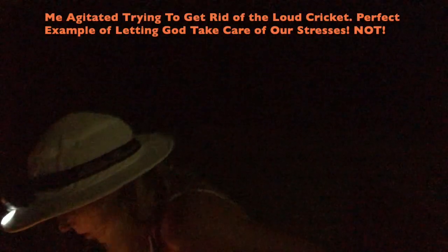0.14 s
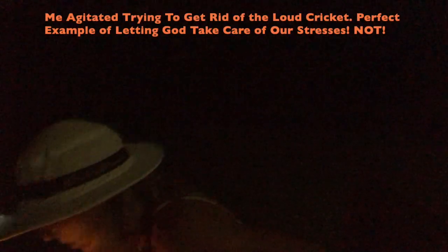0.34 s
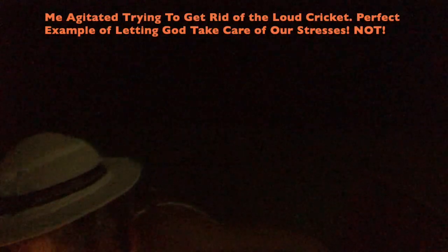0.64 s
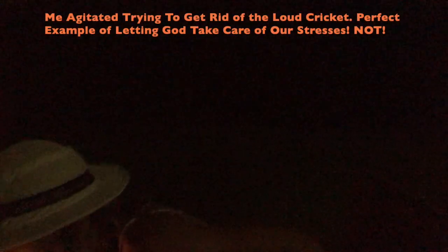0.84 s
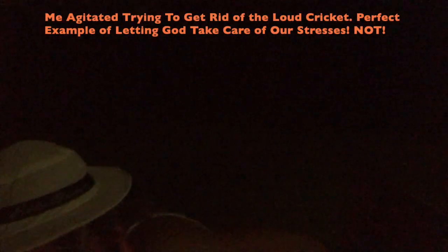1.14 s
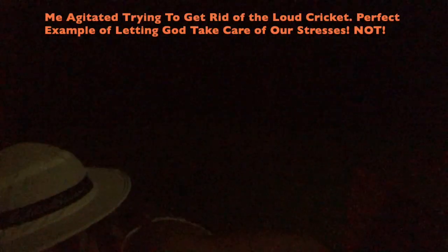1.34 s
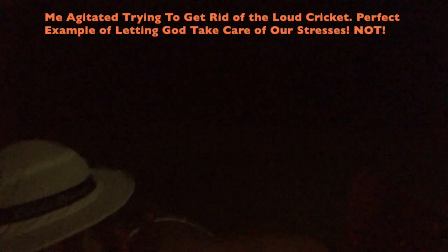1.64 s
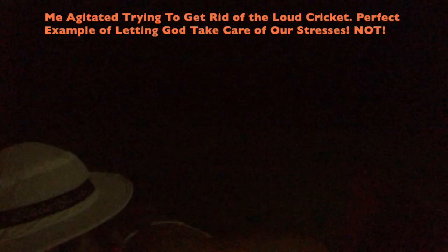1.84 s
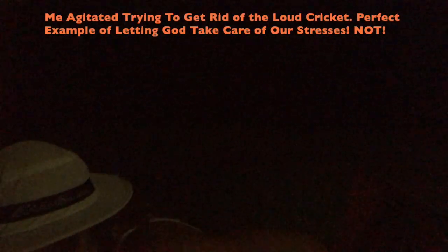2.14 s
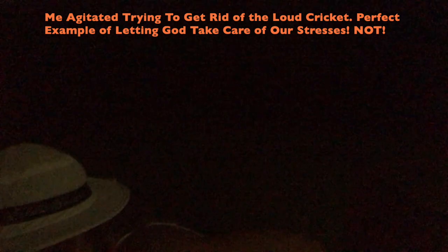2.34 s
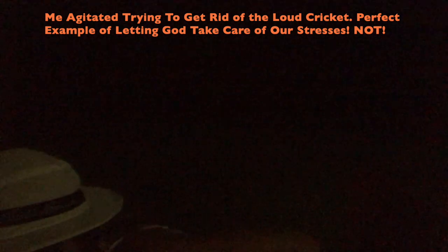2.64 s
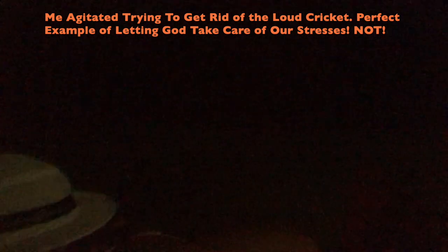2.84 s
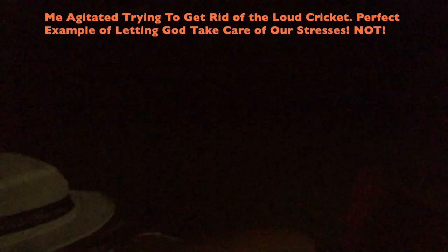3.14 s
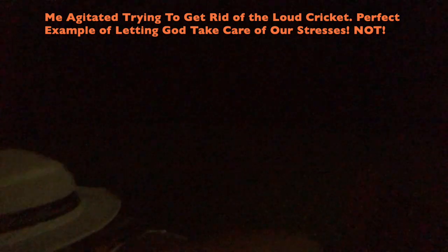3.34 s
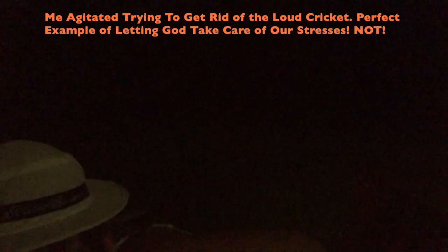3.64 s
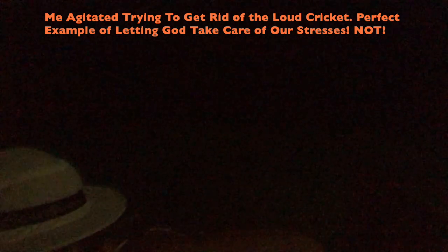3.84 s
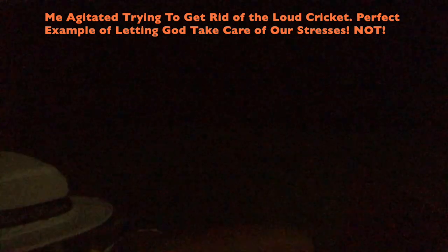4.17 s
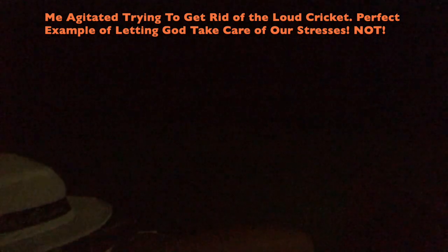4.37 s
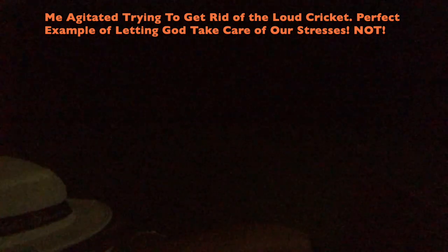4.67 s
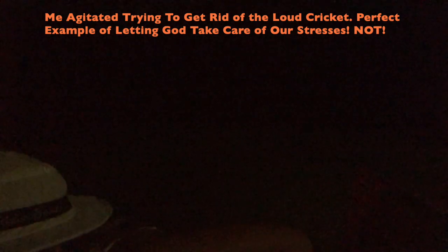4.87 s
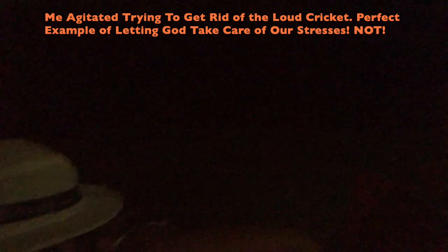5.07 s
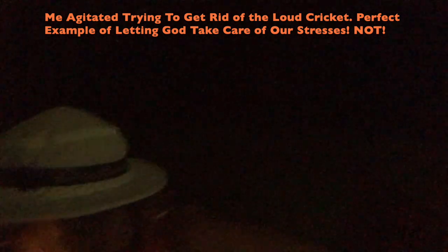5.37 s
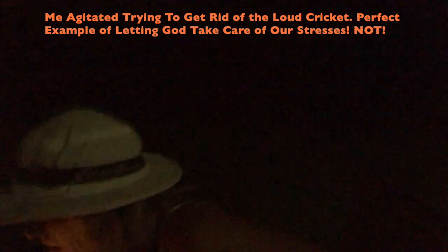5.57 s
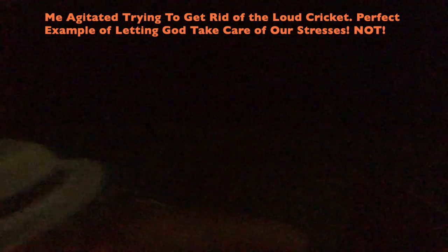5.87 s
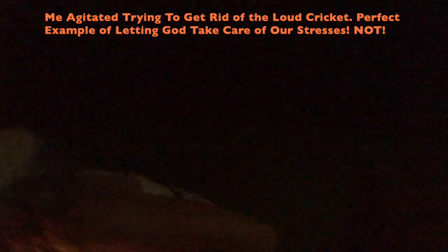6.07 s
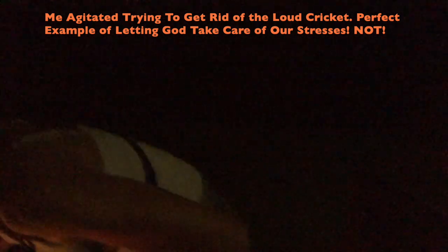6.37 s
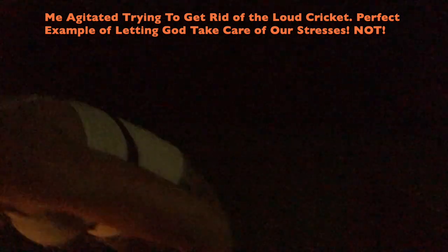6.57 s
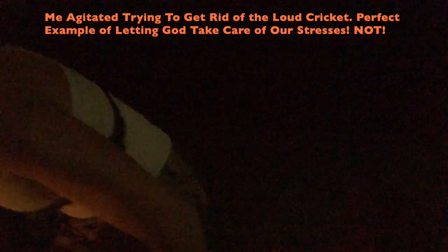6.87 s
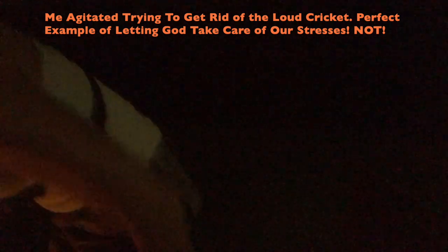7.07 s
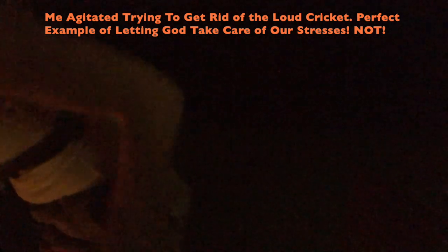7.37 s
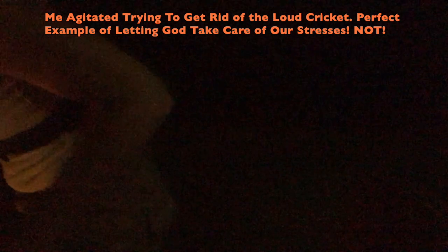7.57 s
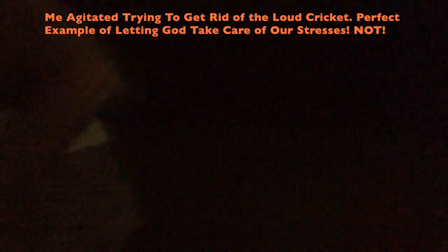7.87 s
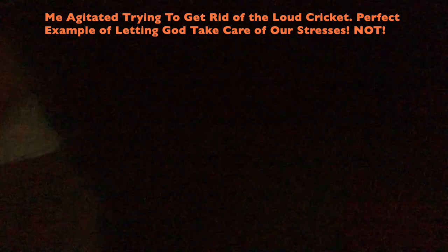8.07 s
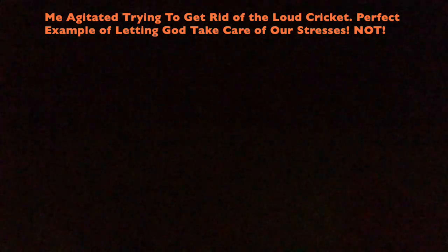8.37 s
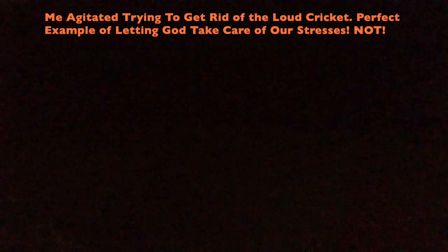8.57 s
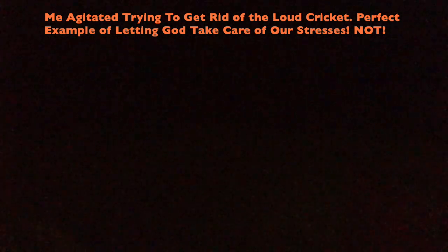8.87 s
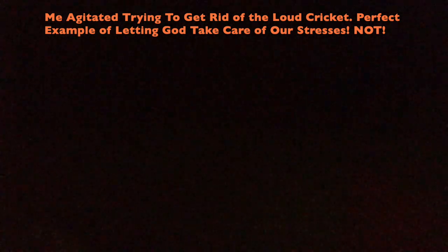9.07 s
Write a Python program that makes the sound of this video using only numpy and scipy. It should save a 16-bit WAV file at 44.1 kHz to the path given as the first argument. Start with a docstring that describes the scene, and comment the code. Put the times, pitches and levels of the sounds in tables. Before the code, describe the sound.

A cricket chirps steadily in quick triplets over a faint night insect chorus while a tool scuffs dry ground, thumps and clinks on stone.

```python
"""Night outdoors, a chorus of far insects over low air noise throughout: noise in flickering bands.
Small high trills and a field cricket chirping in threes (near-sine strokes) begin; a katydid hisses in puffs.
Soon a metal tool scuffs dry ground (grit clicks), a far animal hoots (arched tones), dull thumps fall
(sinking sines) and the blade clinks on stone (ringing modes). From 3 s to 5.7 s a nearer cricket joins now
and then, with overtones and rasp; scuffs pause after 5 s and return faintly near the end."""
import sys
import numpy as np
from scipy import signal
from scipy.fft import rfft, irfft
from scipy.io import wavfile
from scipy.ndimage import uniform_filter1d

SR = 44100
rng = np.random.default_rng(int(sys.argv[2]) if len(sys.argv) > 2 else 0)


def put_to_file(sound):
    """Save the sound as 16-bit audio at rate SR, in the file named by the first command-line argument."""
    columns = np.atleast_2d(sound).T  # one column per channel
    safe = np.clip(columns, -1, 1)
    whole_steps = np.round(safe * 32767)
    wavfile.write(sys.argv[1], SR, whole_steps.astype(np.int16))


N = 406161

# Swell of far chorus and night air: time_s, chorus_db, air_db
NIGHT_LEVELS = [(0, -54.5, -67.5), (2.5, -55, -69), (5.7, -55.5, -69.5), (6.5, -53, -62.5),
                (7.9, -56.5, -70.5), (9.21, -52.5, -63)]
# Chorus spectrum, relative: frequency_hz, density_db
CHORUS_SPECTRUM = [(1300, -58), (1700, -25.5), (2020, -13), (2650, -5), (2810, 3.5), (2970, -6),
                   (3600, -20.5), (5330, -7.5), (5750, -12), (6200, -23.5), (7500, -27.5), (8100, -37.5),
                   (12400, -38), (16000, -33)]
# Air noise spectrum, relative: frequency_hz, density_db
AIR_SPECTRUM = [(30, -48), (70, -5), (157, 1), (455, -2.5), (1220, -9), (1700, -9.5), (2300, -30.5)]
# Katydid level curve: time_s, level_db
KATYDID_LEVELS = [(0, -76), (1, -87), (3, -73), (5, -71.5), (6.3, -66), (7.6, -89), (8.3, -65.5),
                  (9.2, -64)]
# Katydid singing bouts, each at its own rasp rate: from_s, rasp_rate_hz
KATYDID_RASP_RATES = [(-.047, 13.3), (3.969, 13.08), (6.186, 13.19)]
# Small high cricket, one trill a row: start_s, level_db
HIGH_TRILLS = [(0.141, -59.5), (0.474, -57), (1.173, -62.5), (1.471, -62), (1.812, -68), (2.463, -67),
               (2.805, -66.5), (4.585, -67), (5.262, -63.5), (5.59, -63), (5.913, -61.5), (7.315, -64.5)]
# Far hoots: start_s, length_s, level_db
FAR_HOOTS = [(0.899, 0.11, -56.5), (1.199, 0.3, -66.5), (1.62, 0.21, -65.5), (4.376, 0.048, -48),
             (6.275, 0.12, -46), (6.771, 0.082, -44.5)]
# Field cricket, three wing strokes a row: middle_s (12 ms before that stroke ends), gap_s, level_db,
# first_under_db (first stroke below the middle one)
FIELD_CHIRPS = [(0.39, 0.049, -34.5, 1), (.864, 0.049, -36.5, 6), (1.327, 0.05, -37.5, 6.5),
                (1.7904, 0.051, -36, 7.5), (2.348, 0.055, -38.5, 1.5), (3.183, 0.052, -37, 1),
                (3.628, .0515, -37.5, 1), (4.092, 0.051, -35.5, 2.5), (4.622, 0.049, -38.5, 4),
                (5.2032, 0.052, -36.5, 18), (5.7004, 0.049, -37.5, -0.5), (6.195, 0.049, -36.5, 7.5),
                (6.702, .051, -35, 1), (7.219, 0.05, -36, 6.5), (7.656, 0.052, -34.5, 4.5),
                (8.173, 0.049, -34, 0.5), (8.6822, 0.05, -34.5, 5), (9.164, 0.049, -34, 3)]
FIRST_GAP_SHARE, LAST_STROKE_DB = 0.91, 0.4   # shorter first gap, slightly louder last stroke
# Near cricket strokes: start_s, level_db, length_s, slip (strength, 0-1)
NEAR_WING_STROKES = [(3.070, -35, 0.019, 0.2), (3.114, -33.5, 0.019, 0.5), (3.915, -34, 0.022, 0.46),
                     (3.961, -29, 0.024, 0.53), (4.01, -28, 0.026, 0.28), (4.745, -34, .023, 0.6),
                     (4.79, -27.5, 0.027, 0.45), (5.162, -29.5, 0.025, 0.13), (5.209, -27.5, 0.025, 0.6),
                     (5.578, -30, 0.023, 0.05), (5.621, -28.5, 0.026, .6)]
NEAR_HZ, NEAR_HZ_PER_DB = 4314, 11.5   # base pitch at -28 dB; stronger strokes are higher
SLIP_AFTER_S, SLIP_WIDTH_S = 0.0104, 0.0018   # slip time into the stroke, width
SLIP_DIP_SHARE, SLIP_RASP_DB = 0.067, -18.5   # pitch dip at full slip, rasp relative to the stroke
# Ground thumps: start_s, level_db, pitch_hz (scale of the sinking pitch)
GROUND_THUMPS = [(1.143, -45.5, 402), (1.167, -49, 157), (1.578, -33, 126), (2.219, -27.5, 565),
                 (2.249, -35.5, 535), (2.876, -46, 270), (3.102, -33, 545), (3.133, -31, 560),
                 (3.14, -44.5, 200), (3.156, -36, 493), (4.803, -25.5, 510), (4.81, -36.5, 221),
                 (7.047, -45, 477), (7.055, -27.5, 240), (7.333, -51, 180), (7.520, -52.5, 206),
                 (8.36, -28.5, 173), (8.868, -47, 388), (9.013, -52.5, 192)]
# Blade meets a stone: time_s, level_db, pitch_factor (set by the grip), ring_factor (on mode t60)
STONE_CLINKS = [(1.57, -45.5, 1.05, 0.65), (2.199, -26.5, 0.97, 0.73), (3.107, -38.5, 0.98, .9),
                (4.176, -36, 1.02, 1.2), (4.207, -43, 1.014, .9), (6.981, -41, 1.17, .35)]
# Blade modes before the grip factors: frequency_hz, level_db, t60_s
BLADE_MODES = [(2550, -1, 0.014), (3290, 8.5, 0.029), (3447, 0.5, 0.02)]
# Tool pushed into dry soil, then dragged: start_s, level_db, treble_db and body_db (over level_db),
# drag_after_s, drag_under_db (below the push)
SOIL_SCUFFS = [(0.725, -42.5, -5, -2.5, 0.022, 21), (1.141, -51, 5, -14, 0.035, 34),
               (1.549, -52, -1, -14, 0.014, -2.5), (2.17, -34, -7.5, -2, 0.059, 10),
               (2.662, -33.5, -12, -8.5, 0.054, 8.5), (3.094, -37, -8, -2.5, 0.055, 9.5),
               (3.525, -34.5, -9, -9, 0.049, 8.5), (4.163, -32.5, -9, -12, 0.053, 8),
               (4.742, -35, -13.5, -15, 0.036, 5.5), (9.127, -56, -11, -5, .04, 28)]
# Pebbles and twigs snap: start_s, level_db, treble_db and body_db (over level_db)
PEBBLE_SNAPS = [(0.739, -37, -2, -4), (0.745, -34, 1, 0.5), (.854, -56.5, -7, 1), (1.597, -49, 8.5, -24),
                (2.198, -26.5, -4.5, -14), (2.231, -55, 2, -10), (2.667, -36, -7, 0), (2.71, -41, -7, -10),
                (3.386, -77, 11, -8), (3.588, -45, 3.5, 2), (4.155, -45, -2, -9), (4.209, -29, -3.5, -12),
                (4.802, -27, -5.5, -5), (7.179, -67, 10.5, -19), (8.161, -64, 1, -17)]
# Grit click spectrum, relative: frequency_hz, density_db
GRIT_SPECTRUM = [(150, -13), (530, -7.5), (1500, -4), (3300, 0), (5200, -0.5), (7000, -4.5), (12000, -9),
                 (16000, -10)]
PUSH_SWELL_S, PUSH_T60_S, DRAG_T60_S = 0.0067, 0.13, 0.13
DRAG_TREBLE_DB, DRAG_BODY_DB = 3.5, 2.5   # added to the push's treble_db and body_db
SNAP_SWELL_S, SNAP_T60_S = 0.0015, 0.035
CUTOFF_HZ = 16240


def amp(db):
    """Decibels to gain."""
    return 10 ** (np.asarray(db) / 20)


def rms_one(x):
    """Scale to rms 1."""
    return x / np.sqrt(np.mean(x ** 2) + 1e-20)


def in_time(rows):
    """Interpolate the columns of a curve table to one value a sample."""
    time_s, *columns = np.transpose(rows)
    return [np.interp(np.arange(N) / SR, time_s, column) for column in columns]


def add(out, start_s, sound):
    """Mix a sound in at a time."""
    i = max(round(start_s * SR), 0)
    out[i:i + len(sound)] += sound[:max(N - i, 0)]


def coloured(x, spectrum):
    """Shape a sound to a spectrum, interpolated over log frequency."""
    hz, db = np.transpose(spectrum)
    grid_hz = np.maximum(np.arange(N // 2 + 1) * SR / N, 1)
    gain = amp(np.interp(np.log(grid_hz), np.log(hz), db))
    return irfft(rfft(x) * gain, N)


def band(x, low_hz, high_hz):
    """Band-pass."""
    edges_hz = [low_hz, min(high_hz, 0.45 * SR)]
    return signal.sosfilt(signal.butter(2, edges_hz, "band", fs=SR, output="sos"), x)


def drift(rate_hz):
    """Low-passed noise, mean 0, rms 1."""
    r = np.exp(-2 * np.pi * rate_hz / SR)
    slow = signal.lfilter([1], [1, -2 * r, r * r], rng.standard_normal(N + SR))[SR:]
    return rms_one(slow - slow.mean())


def scatter(x, t60_s):
    """Diffuse tail from plants and walls: convolution with decaying noise."""
    t = np.arange(round(t60_s * SR)) / SR
    tail = rng.standard_normal(len(t)) * amp(-60 * t / t60_s) * np.minimum(t / 0.0078, 1)
    return signal.fftconvolve(x, tail / np.sqrt(np.sum(tail ** 2)))[:N]


def ring(x, hz, t60_s):
    """Two-pole resonator: a unit click starts a decaying sine of height about 1."""
    r, w = amp(-60 / (t60_s * SR)), 2 * np.pi * hz / SR
    return signal.lfilter([0, np.sin(w)], [1, -2 * r * np.cos(w), r * r], x + 1e-18)


def stroke(hz, length_s, fall, skew, overtones_db, slip_s=0, slip=0):
    """File over scraper: a near sine falls in pitch as the wing closes; a slip jolts it and dips the pitch."""
    u = np.arange(round(length_s * SR)) / (length_s * SR)
    late = (u * length_s - slip_s) / SLIP_WIDTH_S
    jolt = slip * np.exp(-late ** 2)
    pitch_hz = hz * (1 + fall * (0.5 - u ** 1.26) - SLIP_DIP_SHARE * jolt)
    phase = 2 * np.pi * np.cumsum(pitch_hz) / SR + rng.uniform(0, 2 * np.pi)
    wave = np.sin(phase)
    for harmonic, db in enumerate(overtones_db, start=2):
        wave = wave + amp(db) * np.sin(harmonic * phase)
    jolt_gain = 1 + 0.7 * jolt - 0.4 * slip * np.exp(-(late - 1.5) ** 2)   # surge, then sag
    return wave * jolt_gain * np.sin(np.pi * u ** skew) ** 0.7


def night():
    """Many far crickets blur into flickering bands; low air noise lies below."""
    chorus_db, air_db = in_time(NIGHT_LEVELS)
    choir = coloured(rng.standard_normal(N), CHORUS_SPECTRUM)
    choir = choir / np.std(band(choir, 1820, 4530))
    low = band(choir, 1330, 3590)
    high = choir - band(choir, 1580, 3520)
    choir = low * amp(1.17 * drift(32)) + high * amp(0.64 * drift(22))
    air = rms_one(coloured(rng.standard_normal(N), AIR_SPECTRUM)) * amp(1.9 * drift(31))
    return amp(chorus_db) * choir + amp(air_db) * air


def katydid():
    """A dry hiss at the very top, one puff per rasp, unevenly loud."""
    t = np.arange(N) / SR
    from_s, rate_hz = np.transpose(KATYDID_RASP_RATES)
    row = np.searchsorted(from_s, t) - 1
    cycles = rate_hz[row] * (t - from_s[row])
    puffs = (0.5 - 0.5 * np.cos(2 * np.pi * cycles)) ** 2.5
    hiss = rms_one(band(band(rng.standard_normal(N), 14000, 16500), 13400, 17500))
    uneven_db = 3.0 * drift(8)
    return amp(in_time(KATYDID_LEVELS)[0] + uneven_db) * puffs * hiss


def trills():
    """Seven short pure pulses, 12.1 ms apart, uneven but on average growing louder."""
    out = np.zeros(N)
    for start_s, level_db in HIGH_TRILLS:
        for k in range(7):
            pulse_db = level_db + 1.0 * (k - 0.5) + 2.0 * rng.normal()
            add(out, start_s + 0.0121 * k, amp(pulse_db) * stroke(7800, 0.0097, 0.017, 1.0, []))
    return out


def hoots():
    """Soft, husky tones arched in pitch and level, trailing off over the distance."""
    out, wobble = np.zeros(N), 1 + 0.028 * drift(40)
    for start_s, length_s, level_db in FAR_HOOTS:
        u = np.arange(round(length_s * SR)) / (length_s * SR)
        arch = np.sin(np.pi * u)
        hz = 462 * (1 + 0.049 * (arch - 0.6)) * wobble[round(start_s * SR):][:len(u)]
        add(out, start_s, amp(level_db) * arch * np.sin(2 * np.pi * np.cumsum(hz) / SR))
    out = out * amp(3.5 * drift(35))   # the voice wavers
    return amp(-2) * out + amp(-13) * scatter(out, 0.25)


def field_cricket():
    """Three strokes a chirp, from a few metres off; weaker ones are a little lower; grass smears their ends."""
    out = np.zeros(N)
    for middle_s, gap_s, level_db, first_under_db in FIELD_CHIRPS:
        strokes = [(middle_s - FIRST_GAP_SHARE * gap_s, level_db - first_under_db, 0.015),
                   (middle_s, level_db, 0.021),
                   (middle_s + gap_s, level_db + LAST_STROKE_DB, 0.019)]
        for s, db, length_s in strokes:
            sound = stroke(4597 + 5.2 * (db + 32), length_s, 0.039, 1.9, [])
            add(out, s + 0.012 - length_s, amp(db) * sound)
    out = out * amp(1.6 * drift(110))   # the file catches unevenly
    return out + amp(-10.5) * scatter(out * amp(4.0 * drift(250)), 0.2)


def near_cricket():
    """Longer strokes with overtones, uneven, with a broad noise rasp where the wing slips."""
    out, rasp, puff = np.zeros(N), np.zeros(N), np.hanning(round(0.011 * SR))
    for start_s, level_db, length_s, slip in NEAR_WING_STROKES:
        slip = np.clip(slip, 0, 1)
        hz = NEAR_HZ + NEAR_HZ_PER_DB * (level_db + 28)
        sound = stroke(hz, length_s, 0.075, 1.13, [-15, -27], SLIP_AFTER_S, slip)
        add(out, start_s, amp(level_db) * sound)
        rasp_puff = amp(level_db + SLIP_RASP_DB) * (0.3 + slip) * puff
        add(rasp, start_s + SLIP_AFTER_S - 0.004, rasp_puff)
    out = out * amp(1.8 * drift(150))   # the file catches unevenly
    white = rng.standard_normal(N)
    top = rms_one(band(band(white, 10900, 14000), 10000, 13500))
    rasp = rasp * (top + amp(-1) * rms_one(band(white, 5300, 16500)))
    return out + rasp + amp(-9.5) * scatter(rasp, 0.077)


def thumps():
    """A soft blow runs through the ground, high waves first, so pitch sinks; dull noise roughens it."""
    out, t = np.zeros(N), np.arange(SR // 4) / SR
    for start_s, level_db, hz in GROUND_THUMPS:
        age = t / (0.012 + 6.2 / hz)   # low thumps last longer
        attack = np.sin(np.pi / 2 * np.minimum(t * hz / 0.45, 1)) ** 2
        shape = attack * (amp(-60 * age ** 1.6) + amp(-19 - 22 * age))
        sinking_hz = hz * (0.5 + 0.62 * np.exp(-t * hz / 3.18) + 1.22 * np.exp(-t * hz / 0.54))
        wave = np.sin(2 * np.pi * np.cumsum(sinking_hz) / SR)
        noise = band(rng.standard_normal(len(t)), 0.5 * hz, 2.12 * hz)
        puff = rms_one(band(noise, 0.27 * hz, 2.86 * hz))
        add(out, start_s, amp(level_db) * shape / shape.max() * (wave + 0.38 * puff))
    return signal.sosfilt(signal.butter(4, 60, "high", fs=SR, output="sos"), out)


def clinks():
    """A scratch of a few milliseconds rings the blade, each mode with fresh noise."""
    out, burst = np.zeros(N), np.hanning(round(0.0083 * SR)) ** 0.18
    for time_s, level_db, pitch_factor, ring_factor in STONE_CLINKS:
        for mode_hz, mode_db, t60_s in BLADE_MODES:
            hz = mode_hz * pitch_factor
            scratch = np.pad(burst * rng.standard_normal(len(burst)), (0, SR // 10))
            note = ring(band(scratch, 0.8 * hz, 1.25 * hz), hz, t60_s * ring_factor)
            add(out, time_s - 0.002, amp(level_db + mode_db) * note / np.max(np.abs(note)))
    return out + amp(-12) * scatter(out, 0.12)


def scuff_levels():
    """Power of body, middle and treble grit: pushes and drags swell, hold and die; snaps are short."""
    moves = []
    for s, db, treble_db, body_db, drag_after_s, drag_under_db in SOIL_SCUFFS:
        start_s = s - PUSH_SWELL_S / 2
        moves.append((start_s, db, treble_db, body_db, PUSH_SWELL_S, PUSH_T60_S))
        moves.append((start_s + drag_after_s, db - drag_under_db, treble_db + DRAG_TREBLE_DB,
                      body_db + DRAG_BODY_DB, PUSH_SWELL_S, DRAG_T60_S))
    moves += [(*row, SNAP_SWELL_S, SNAP_T60_S) for row in PEBBLE_SNAPS]
    powers, t = np.zeros((3, N)), np.arange(SR // 3) / SR
    for start_s, db, treble_db, body_db, swell_s, t60_s in moves:
        fade_s = np.maximum(t - swell_s - 0.088 * t60_s, 0)
        shape = np.minimum(t / swell_s, 1) ** 2 * amp(-60 * fade_s / t60_s)
        for power, part_db in zip(powers, (body_db, 0, treble_db)):
            add(power, start_s, (amp(db + part_db) * shape) ** 2)
    return powers


def scuffs():
    """Dense random grit clicks, split into patchy bands, sound under each push, drag and snap."""
    powers = scuff_levels()
    hits = rng.random(N) < 6000 / SR   # 6000 clicks/s
    clicks = hits * amp(3.5 * np.minimum(rng.exponential(1, N), 3.2)) * rng.choice([-1, 1], N)
    grit = coloured(clicks, GRIT_SPECTRUM) * amp(2.0 * drift(105))
    edges_hz = np.geomspace(200, 19000, num=25)
    patches = []
    for k, (low_hz, high_hz) in enumerate(zip(edges_hz, edges_hz[1:])):
        patchy = amp(3.5 * drift(29))   # each band swells and fades at random
        patches.append(band(grit, low_hz, high_hz) * patchy * (-1) ** k)
    # body below 1.9 kHz, treble above 8.9 kHz
    parts = [rms_one(sum(group)) for group in (patches[:12], patches[12:20], patches[20:])]
    return np.sum(np.sqrt(powers) * parts, axis=0)


def scene():
    """All sources, one channel; ground and near cricket share a diffuse tail."""
    singer, ground = near_cricket(), scuffs()
    tail = amp(-11) * scatter(ground + 0.5 * singer, 0.24)
    background = night() + katydid() + trills() + hoots()
    return (background + field_cricket() + singer + thumps() + clinks() + ground + tail)[None]


def record(dry):
    """Gain control ducks at loud sounds and creeps back; small-microphone bass cut; steep top cut."""
    level_db = 10 * np.log10(uniform_filter1d(dry[0] ** 2, size=882) + 1e-12)   # 20 ms window
    duck_db = 0.78 * np.maximum(level_db + 32.5, 0)
    creep_db = 9.7 * np.arange(N) / SR   # recovers 9.7 dB/s
    duck_db = np.maximum.accumulate(duck_db + creep_db) - creep_db
    r = np.exp(-1 / (0.024 * SR))   # 24 ms smoothing
    out = dry * amp(-signal.lfilter([1 - r], [1, -r], duck_db))
    out = signal.sosfilt(signal.butter(2, 34, "high", fs=SR, output="sos"), out)
    return signal.sosfilt(signal.cheby2(24, 60, CUTOFF_HZ, fs=SR, output="sos"), out)


dry = scene()
out = record(dry)
put_to_file(out)
```